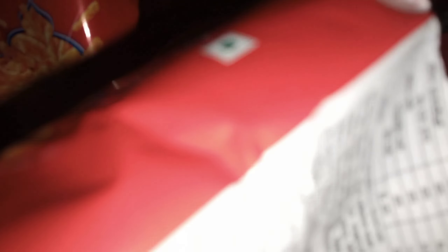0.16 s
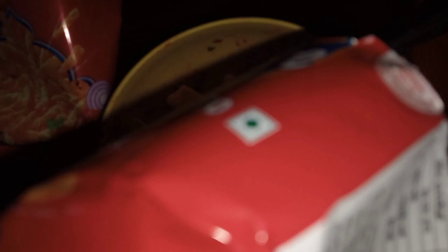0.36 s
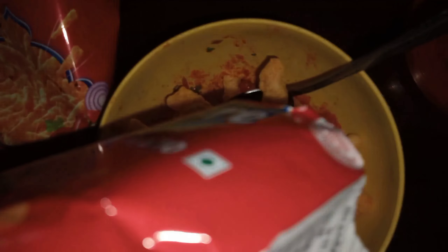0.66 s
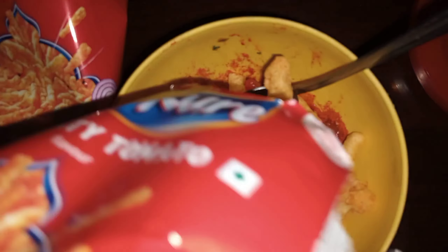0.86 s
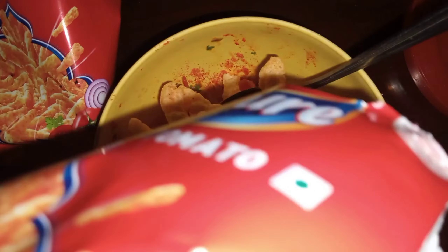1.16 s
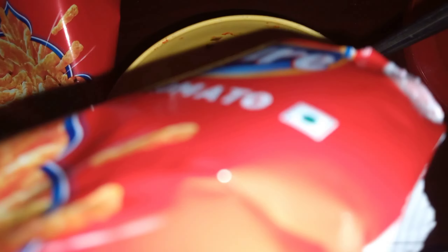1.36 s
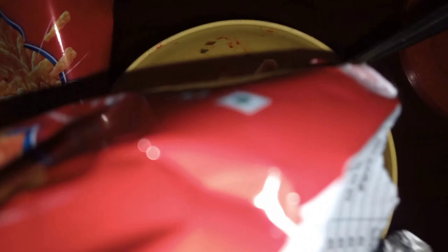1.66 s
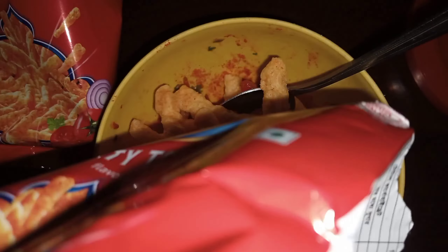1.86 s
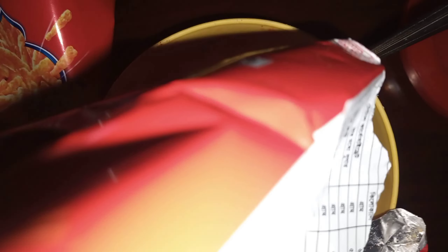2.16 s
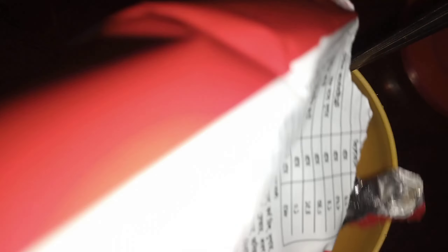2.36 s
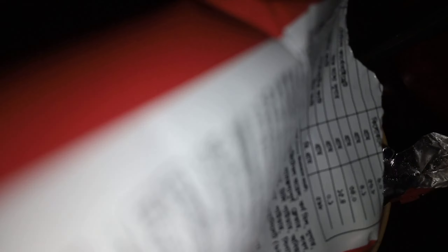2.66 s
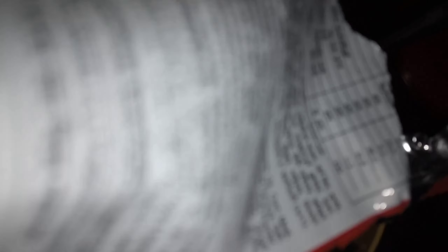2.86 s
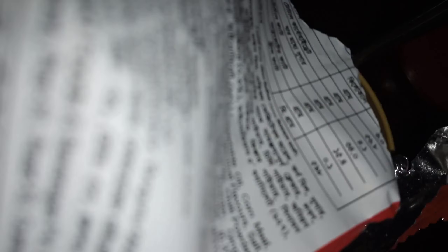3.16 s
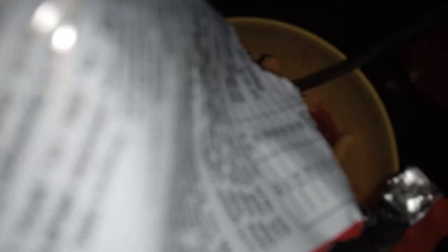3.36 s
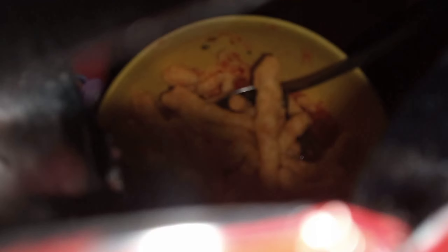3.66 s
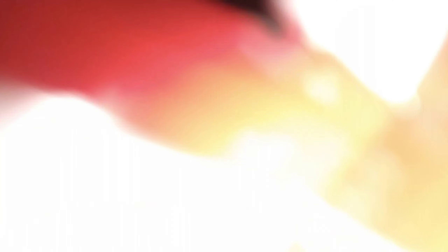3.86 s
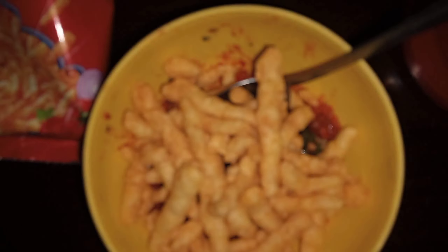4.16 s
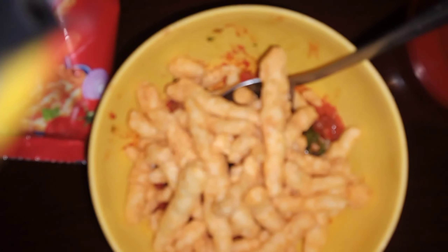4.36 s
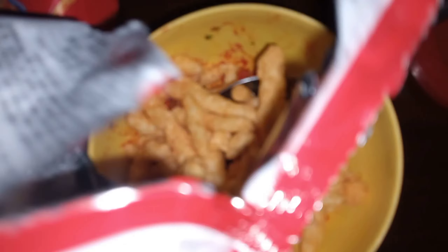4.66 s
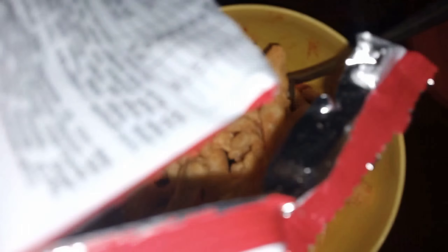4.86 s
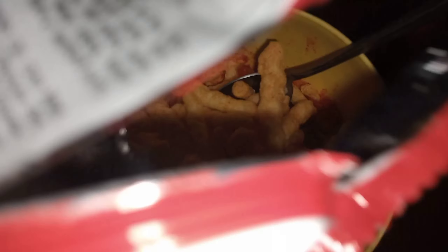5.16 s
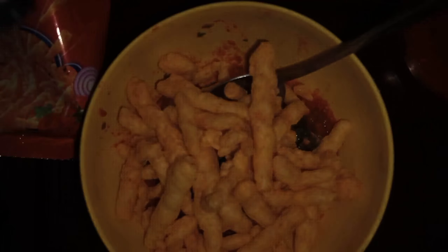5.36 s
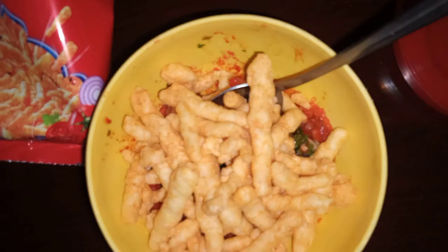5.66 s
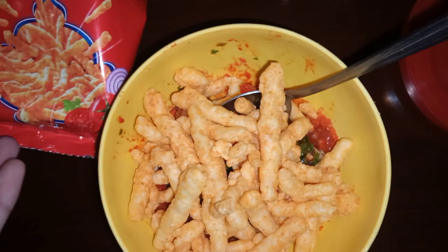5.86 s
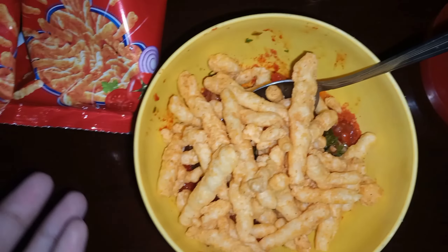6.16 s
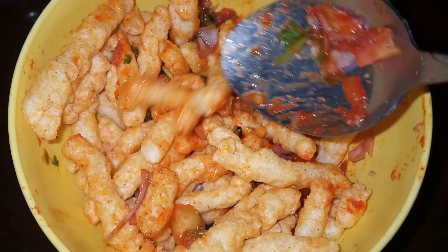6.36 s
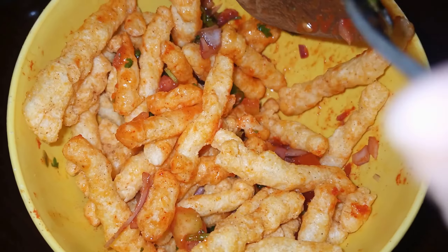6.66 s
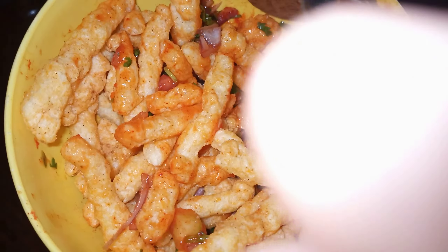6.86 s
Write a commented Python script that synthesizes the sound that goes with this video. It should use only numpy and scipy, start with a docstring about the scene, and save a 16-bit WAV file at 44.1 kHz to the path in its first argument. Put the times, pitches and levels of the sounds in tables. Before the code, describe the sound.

A crinkly foil snack packet snaps and rustles up close over a faint low kitchen hum, then cuts briefly to quieter, duller room air.

```python
"""In a kitchen with a low hum, a crinkly foil snack packet is shaken over a bowl close to a phone.
Buckling creases snap and excite resonant bands of the film; small creases rustle between them.
Two near walls throw each snap back, knocks reach the phone through the hand, and shaped noise makes
hum, bass and air. Near the end the sound drops out for a moment and returns as a quieter, duller kitchen."""
import sys
import numpy as np
from scipy import signal
from scipy.fft import rfft, irfft, next_fast_len
from scipy.io import wavfile
from scipy.ndimage import uniform_filter1d

SR = 44100
rng = np.random.default_rng(int(sys.argv[2]) if len(sys.argv) > 2 else 0)


def unload_audio(sound):
    """Save the sound as a 16-bit wav file, at the path given as the first command line argument."""
    columns = np.transpose(np.atleast_2d(sound))
    # keep every value between -1 and 1, then stretch to whole-number steps
    steps = np.round(np.clip(columns, -1, 1) * 32767)
    wavfile.write(sys.argv[1], SR, steps.astype(np.int16))


N = 309582  # length in samples


def amp(db):
    """Decibel law: a level becomes an amplitude ratio."""
    return 10 ** (np.asarray(db) / 20)


def evened(x):
    """Normalisation: the signal is brought to rms 1."""
    return x / np.sqrt(np.mean(x ** 2) + 1e-20)


def read(points, hz):
    """Logarithmic pitch scale: a table of frequency is read along log frequency."""
    f, value = np.transpose(points)
    return np.interp(np.log(hz + 1), np.log(f + 1), value)


def curve(rows, column=1):
    """Envelope: one column of a table is joined by straight lines over time."""
    rows = np.array(rows)
    return np.interp(np.arange(N) / SR, rows[:, 0], rows[:, column])


def coloured(x, points):
    """Linear filtering: the spectrum is multiplied by a response, then the rms is set to 1."""
    size = next_fast_len(N)
    spectrum = rfft(x, size)
    response = amp(read(points, np.fft.rfftfreq(size, 1 / SR)))
    return evened(irfft(spectrum * response, size)[:N])


def patchy(points, patchy_db):
    """Non-stationary noise: a short-time spectrum drifts in patches; rms 1."""
    frames, hz = N // 256 + 5, np.fft.rfftfreq(1024, 1 / SR)
    real, imaginary, patches = rng.standard_normal((frames, 513, 3)).T
    patches = uniform_filter1d(patches, size=10, axis=0)  # smooth over frequency
    patches = evened(uniform_filter1d(patches, size=12, axis=1))  # smooth over time
    level = read(points, hz)[:, None] + patchy_db * patches
    spectra = (real + 1j * imaginary) * amp(level)
    return evened(signal.istft(spectra, nperseg=1024, noverlap=768)[1][:N])


def band(x, hz, width):
    """Resonance: a bandpass filter passes a band around a centre frequency."""
    edges = np.clip([hz - width / 2, hz + width / 2], 300, 19000)
    return signal.sosfilt(signal.butter(2, edges, "band", fs=SR, output="sos"), x)


# the loudest creases that buckle: (time [s], ring of the film [dB], belly, panel and edge [dB re that ring],
# note of the film [Hz], note of the panel [Hz])
LOUD_SNAPS = [(0.0073, -28.5, -27, -5, -22, 6670, 3640), (0.1093, -23, -9, 4, -45, 6900, 3780),
              (0.3421, -16.5, -18.5, -11, -7, 6600, 4020), (0.483, -15, -18, -3, -33.5, 6100, 3410),
              (0.3925, -45, -20, -10, -8.5, 7300, 3600), (0.5492, -38, -4.5, -1, -31, 6100, 2810),
              (0.6428, -20.5, -16, 3.5, -7.5, 6030, 3870), (0.645, -12.5, -23.5, -5.5, -43.5, 6400, 3580),
              (0.6544, -46, 14.5, -18, -23.5, 6800, 3500), (0.6955, -42.5, -6, -3, -13.5, 7000, 3600),
              (0.7898, -39.5, -14.5, -9.5, -8, 6560, 2840), (0.8102, -22.5, -10.5, -5, -10.5, 7100, 3530),
              (0.8139, -19, -10.5, 2.5, -2.5, 7370, 3600), (0.8235, -43.5, -7, 7, -14.5, 5800, 3430),
              (0.8361, -20.5, -11, -2.5, -21, 4900, 2820), (0.845, -17, -6, -5, -7.5, 6200, 3760),
              (0.8603, -27.5, -8, -5, -20, 5800, 4640), (0.87, -39.5, -17, -2, -35, 5470, 3960),
              (0.908, -23, -8.5, 1.5, -4.5, 6900, 3180), (0.9146, -21, -22, -3, -36, 6280, 2740),
              (0.9225, -26, -18, -13, -10, 5810, 2780), (0.929, -28, -3.5, 0, -18, 7800, 3130),
              (0.9457, -23, -5, -2, -8, 5290, 3350), (1.0115, -11, -10.5, -4.5, -4, 4600, 3340),
              (1.113, -42, 1.5, 10, -33, 5700, 3440), (1.2969, -12.5, -35, -6, -8, 6100, 4750),
              (1.3115, -31.5, -7.5, -6.5, -10, 6440, 3400), (1.6608, -35, -23, -13, -28, 6700, 3880),
              (1.6734, -34.5, 11, -19.5, -22, 6950, 2720), (1.679, -22.5, -26, -5, -33, 7000, 3760),
              (1.695, -36, -12.5, 5, -25, 6670, 3840), (1.706, -29.5, -3, -18, -13, 6060, 3900),
              (1.742, -35, 0.5, -2, -32, 6300, 3800), (1.8092, -40.5, -19, -29, -34, 6460, 2810),
              (1.8244, -25.5, -24.5, -16, -19.5, 6350, 3330), (1.8315, -31.5, -19, -15, -34, 6400, 3390),
              (1.84, -36, -30, 2.5, -22.5, 6600, 3480), (1.8534, -34, -27, -4, -31, 6350, 3060),
              (1.888, -49, -20, 6.5, -14, 6200, 2970), (1.907, -38, -29, -26, -27, 6700, 3660),
              (1.9403, -32.5, -24, -6, -18, 6500, 4740), (1.9745, -22, -27, -12.5, -11.5, 5540, 3800),
              (1.994, -28.5, -28, 1, -18.5, 6500, 3550), (2.0391, -41, -21, 12.5, -26, 6800, 3420),
              (2.0472, -22.5, -40, -12, -14.5, 6300, 3500), (2.3756, -36, -7, -9, -2, 6040, 3590),
              (2.427, -38.5, -12, -11, -36, 6060, 3680), (2.497, -39, -8, -10, -14, 6000, 3640),
              (2.5077, -38.5, -4, 9.5, -11.5, 6470, 3400), (2.6003, -32.5, -19, 7.5, -27, 6500, 4230),
              (2.6917, -31, -16, -14, -19, 6100, 3600), (2.7294, -38, -6.5, -12, -30, 6360, 4210),
              (2.7528, -38, -5.5, 15.5, -16, 6650, 3700), (2.8436, -46, -16, -9, -30, 7150, 4200),
              (3.056, -39, -10, 0, -20, 6000, 3500), (3.114, -40.5, -15, -4.5, -22, 6970, 4660),
              (3.2106, -45, 1.5, 5, -19, 6440, 4060), (3.2961, -26, -13, -4, -25, 6100, 4380),
              (3.3794, -37.5, -14, -5.5, -5.5, 6840, 3730), (3.4956, -38.5, -9, 2.5, -0.5, 6240, 3560),
              (3.513, -34, -29, -19, -27, 6600, 3100), (3.5222, -38.5, -9, -5, -5.5, 5850, 2810),
              (3.534, -40, -19, -9.5, -12.5, 7640, 3850), (3.5684, -25.5, -41, -10, -15, 4950, 5000),
              (3.58, -36, -32, -29, -30, 6300, 4630), (3.606, -40.5, -26, -19, -30, 6200, 4590),
              (3.6147, -29, -24, -20, -19.5, 6340, 3710), (3.6177, -35, -26, -12, -29, 6300, 3570),
              (3.621, -31, -32, -25, -23.5, 6350, 4800), (3.6625, -28.5, -18, 0.5, -23.5, 6540, 3530),
              (3.67, -33.5, -12, 5.5, -36, 5000, 3610), (3.686, -38.5, -13, -2.5, -8, 6600, 3630),
              (3.7168, -18.5, -44, -37.5, -17.5, 6220, 4960), (3.7265, -37.5, -30, -20, -20, 6240, 4900),
              (3.7837, -32.5, -32, -6, -15, 6400, 4590), (3.8132, -27, -34, -4, -23.5, 6540, 3800),
              (3.8716, -37, -10, -6, -35, 5770, 4600), (4.065, -46.5, -0.5, -19, 2, 6360, 3030),
              (4.0908, -40.5, 0, 5.5, -4, 6670, 3030), (4.5413, -38.5, -14, -8.5, 0.5, 6200, 2810),
              (4.936, -47.5, -13, -16, -3.5, 7000, 3600), (5.1027, -36, -8, -3.5, -18, 5680, 3460),
              (5.5406, -29, -9.5, -3.5, -40, 6900, 4200), (5.5455, -35.5, -11.5, -3, -20, 5900, 2810),
              (5.774, -44.5, -24, -18, -12.5, 6940, 3600), (5.8763, -38.5, -9, 1.5, -22.5, 5860, 3520),
              (6.018, -16.5, -40, -18, -5.5, 7320, 3560), (6.138, -47.5, -26, -19, -3.5, 6250, 3600),
              (6.1613, -26.5, -7, 9.5, -9, 4500, 3980), (6.173, -42, -7, 10.5, -21, 5500, 3600)]
# resonances a snap excites, in the order film, belly, panel, edge, tip: (centre [Hz], width [Hz])
PACKET_BANDS = [(6550, 1530), (2002, 730), (3600, 1120), (10350, 4650), (14200, 4500)]
FILM_WIDTH_HZ, PANEL_WIDTH_HZ = 720, 395  # narrow notes
SKIRT_DB = -1  # the broad crack around the notes, for a film ring of -16.5 dB
HARD_DB, HARD_MS, BUSY_DB = -18, 1.15, -50  # a hard snap in moderate handling: its slips fall 9 dB in HARD_MS
LONGER_SOFT, LONGER_BUSY = 0.34, 0.4  # slips last longer in softer snaps and busier handling: dB of length per dB
RISE_MS = 0.53  # slips build up
TWIN_MS, TWIN_DB = (1.0, 2.6), -6  # range of lag, and level, of the twin crease


def slip_bursts(rows, starts, t, lead):
    """Stick-slip friction: a creak grows until the release, then random slips decay; also gives spare draws."""
    draws = rng.standard_normal((len(rows), len(t) + 2))
    softness = LONGER_SOFT * (HARD_DB - rows[:, 1])
    busyness = LONGER_BUSY * (curve(HANDLING)[starts] - BUSY_DB)
    length_ms = np.clip(HARD_MS * amp(softness + busyness), .5, 20)[:, None]
    creak = amp(-22.5 + 3000 * np.minimum(t, 0))  # grows by 3 dB per ms
    slips = amp(-9 * np.maximum(t, 0) * 1000 / length_ms)
    rise = np.clip(t * 1000 / RISE_MS, 0, 1)
    bursts = draws[:, 2:] * ((1 - rise) * creak + rise * slips)
    bursts[:, lead + 8] += 2.2  # the click of the release itself
    # a twin crease follows each snap, so its spectrum splits into bands
    lags = (SR / 1000 * np.interp(np.tanh(draws[:, 1]), (-1, 1), TWIN_MS)).astype(int)
    bursts = np.array([b + amp(TWIN_DB) * np.roll(b, lag) for b, lag in zip(bursts, lags)])
    return bursts, draws


def snaps():
    """Impulsive excitation of resonators: each buckling crease lets go in a burst that rings the packet."""
    lead = 300  # samples of creak before the release
    rows = np.array(LOUD_SNAPS + lesser())
    out, t = np.zeros(N + 2000), (np.arange(1300) - lead) / SR
    starts = np.maximum(np.round(rows[:, 0] * SR).astype(int), 0)
    bursts, draws = slip_bursts(rows, starts, t, lead)
    crisp = bursts * amp(-1200 * np.maximum(t, 0))  # the treble dies first
    excitations = [bursts] * 3 + [crisp] * 2
    broad = np.array([band(x, *part) for x, part in zip(excitations, PACKET_BANDS)])
    for k, (s, film_db, belly_db, panel_db, edge_db, film_hz, panel_hz) in enumerate(rows):
        film, belly, panel, edge, tip = map(evened, broad[:, k])
        skirt = amp(SKIRT_DB + .3 * (film_db + 16.5))  # hard snaps crack more broadly
        belly_hz = PACKET_BANDS[1][0] * (1 + 0.16 * draws[k, 0])
        film = skirt * film + evened(band(bursts[k], film_hz, FILM_WIDTH_HZ))
        panel = skirt * panel + evened(band(bursts[k], panel_hz, PANEL_WIDTH_HZ))
        belly = skirt * belly + evened(band(bursts[k], belly_hz, 350))
        edge = edge + amp(-2.0) * tip
        for ring, db in zip((film, belly, panel, edge), (0, belly_db, panel_db, edge_db)):
            loudest = np.sqrt(2 * uniform_filter1d(ring ** 2, size=88).max())  # over 2 ms
            out[starts[k]:starts[k] + len(t)] += amp(film_db + db) * ring / loudest
    return out[lead:lead + N]


# mean and spread of a lesser snap: (film [dB re handling], belly, panel and edge [dB re film], film and panel [Hz])
LESSER_MEAN = (0.5, -15, -4, -23.5, 6304, 3509)
LESSER_SPREAD = (3.5, 7, 8.6, 7.4, 550, 510)
LESSER_COUNT = 120
CROWDING = .7  # dB of density per dB of handling


def lesser():
    """Random point process: rows for lesser snaps fall by chance, thicker where handling is harder."""
    level, draws = curve(HANDLING), rng.standard_normal((LESSER_COUNT, 6))
    before_break = np.arange(N) / SR < BREAK_LEVELS[0][0][0]
    share = np.cumsum(amp(CROWDING * level) * before_break)
    at = np.searchsorted(share, share[-1] * rng.random(LESSER_COUNT))
    rows = LESSER_MEAN + np.clip(draws, -2, 2) * LESSER_SPREAD
    return [(k / SR, level[k] + row[0], *row[1:]) for k, row in zip(at, rows)]


# handling of the packet: (time [s], level [dB]); the rustle is set 7 dB under it
HANDLING = [(0.0, -42), (0.1, -56), (0.28, -65), (0.76, -53.5), (0.9, -36.5), (1.09, -42), (1.18, -48.5),
            (1.58, -58), (1.69, -37.5), (1.79, -47.5), (1.9, -40), (2.03, -54), (2.4, -49), (3.06, -54),
            (3.4, -57), (3.62, -53), (3.84, -58), (6.09, -55.5), (6.17, -46), (6.32, -52)]
# relative spectrum of the rustle: (frequency [Hz], level [dB])
RUSTLE_COLOUR = [(900, -27), (1600, -13), (2550, -2), (3600, 8.5), (4900, -4.5), (6150, 8), (7500, -4.5),
                 (10000, -23), (12400, -13.5), (15200, -15), (16500, -27)]


def rustle():
    """Crackling noise: many small creases tick at random, some as thin clicks, some with a short note."""
    sizes, chance = rng.exponential(1, (2, N)), rng.random((2, N))
    notes = amp(2.0 * np.minimum(sizes[0], 5)) * (chance[0] < 3000 / SR)  # 3000 per second
    clicks = amp(4.1 * np.minimum(sizes[1], 5)) * (chance[1] < 700 / SR)  # 700 per second
    crease, t, ringing = rng.integers(0, 40, N), np.arange(400) / SR, np.zeros(N)
    for k, hz in enumerate(np.geomspace(1300, 16000, num=40)):
        note = np.sin(2 * np.pi * hz * t) * np.minimum(t / 0.00042, 1) * np.exp(-t / 0.0031)
        rung = signal.oaconvolve(notes * (crease == k), note)[:N]
        ringing += amp(read(RUSTLE_COLOUR, hz)) * np.sqrt(hz) * rung
    thin = signal.oaconvolve(clicks, np.exp(-t / 0.00053))[:N] * rng.standard_normal(N)
    mix = evened(ringing) + amp(-1.0) * coloured(thin, RUSTLE_COLOUR)
    return amp(curve(HANDLING) - 7.0) * evened(mix)


# decay of the kitchen's reverberation: (frequency [Hz], time to fall 60 dB [s])
KITCHEN_DECAY = [(1000, 0.36), (2500, 0.15), (4000, 0.12), (7000, 0.088), (12000, 0.058)]
FLUTTER_S, FLUTTER_DB = .0105, 10  # spacing; level of the second return re one tap, before the decay
REFLECTIONS_DB = -11  # flutter and tail together, re the direct sound


def kitchen(x):
    """Room reflection: a flutter between two near walls, and a sparse tail whose bands die at their own speeds."""
    taps = np.zeros(SR // 2)
    at = np.arange(100, len(taps) - 20, 20)
    taps[at + rng.integers(0, 20, len(at))] = rng.choice([-1., 1.], len(at))
    for k in (1, 2, 3, 4):
        # shelves scatter each return
        rough = rng.standard_normal(150) * np.exp(-np.arange(150) / (8.3 * k))
        returned = amp(FLUTTER_DB - 4 * (k - 2.0)) * rough / np.linalg.norm(rough)
        taps[round(k * FLUTTER_S * SR):][:150] += returned
    hz, t, z = signal.stft(taps, SR, nperseg=256)
    t60 = np.maximum(read(KITCHEN_DECAY, hz), .02)[:, None]
    tail = signal.istft(z * amp(-60 * t / t60), SR, nperseg=256)[1]
    return x + signal.fftconvolve(x, amp(REFLECTIONS_DB) * tail / np.linalg.norm(tail))[:N]


# knocks through the hand into the phone: (time [s], peak of the swell [dB], pitch [Hz], length [s])
KNOCKS = [(0.054, -50, 71, 0.07), (0.172, -39, 90.5, 0.037), (.62, -53, 69.4, 0.033),
          (0.831, -46.5, 71.4, 0.054), (1.105, -43, 66, 0.054), (1.265, -57, 50, 0.037),
          (2.044, -56, 60, 0.032)]


def thumps():
    """Structure-borne sound: each knock is a few low cycles under a soft swell that peaks at a third of its length."""
    out = np.zeros(N)
    for s, db, hz, length in KNOCKS:
        t = np.arange(0, 3 * length, 1 / SR)
        swell = 3 * t / length * np.e * np.exp(-3 * t / length)
        out[round(s * SR):][:len(t)] += amp(db) * np.sin(2 * np.pi * hz * t) * swell
    return out


# the hum swells and the bass bumps, before wavering: (time [s], hum level [dB], bass level [dB])
HUM_BASS_LEVELS = [(0.0, -50.5, -70.5), (0.14, -41, -60), (0.19, -60, -43), (0.26, -54, -60),
                   (0.44, -50, -64), (0.63, -54, -52.5), (0.77, -52, -63.5), (1.07, -55.5, -57),
                   (1.39, -52.5, -63), (1.94, -54.5, -64.5), (2.0, -42.5, -63), (2.13, -52, -61),
                   (2.22, -42.5, -64.5), (2.31, -50.5, -63.5), (2.83, -50, -63.5), (3.13, -54, -72),
                   (3.22, -46, -50.5), (3.29, -49, -61), (3.36, -34.5, -42.5), (3.5, -51.5, -61),
                   (3.55, -46.5, -61.5), (3.63, -58.5, -62.5), (3.68, -48.5, -46), (3.77, -54.5, -63.5),
                   (6.32, -54, -66.5)]
# relative spectrum of the hum: (frequency [Hz], level [dB])
HUM_COLOUR = [(110, -55.5), (150, -12), (200, -1.5), (250, 7), (300, 0.5), (380, -7.5), (600, -30.5),
              (705, -3.5), (820, -47.5), (1100, -56.5)]
# relative spectrum of the bass: (frequency [Hz], level [dB])
BASS_COLOUR = [(45, -43.5), (70, -9.5), (95, -4.5), (124, 13), (150, 3), (220, -53.5)]
HUM_WAVER_DB, BASS_WAVER_DB = 0.5, 2.5  # rms of the random wavering


def slow_waver(x, db):
    """Amplitude modulation: noise smoothed twice gives a slow random level in dB."""
    return db * evened(uniform_filter1d(uniform_filter1d(x, size=3000), size=3000))


def hum():
    """Narrow-band noise: a fuzzy hum with a faint overtone, and lumpy bass under it; both waver."""
    hum_noise, bass_noise, hum_drift, bass_drift = rng.standard_normal((N, 4)).T
    hum_db = curve(HUM_BASS_LEVELS) + slow_waver(hum_drift, HUM_WAVER_DB)
    bass_db = curve(HUM_BASS_LEVELS, 2) + slow_waver(bass_drift, BASS_WAVER_DB)
    return amp(hum_db) * coloured(hum_noise, HUM_COLOUR) + amp(bass_db) * coloured(bass_noise, BASS_COLOUR)


# relative spectral density of the kitchen air: (frequency [Hz], level [dB per Hz])
AIR_COLOUR = [(18, -32), (30, -37.5), (59, -19), (251, -8.5), (511, -15.5), (700, -10.5), (863, -13.5),
              (1420, -13.5), (1750, -15.5), (2740, -15), (5010, -25.5), (6020, -25), (11300, -46.5),
              (15900, -44.5)]
AIR_DB = -51.5  # rms


def kitchen_air():
    """Broadband background noise: steady air whose spectrum drifts in patches."""
    return amp(AIR_DB) * patchy(AIR_COLOUR, patchy_db=2.5)


# relative spectral density of the air after the break: (frequency [Hz], level [dB per Hz])
LATE_AIR_COLOUR = [(18, -38), (30, -5), (86, -16), (153, 1), (245, 6), (294, 1), (553, -9), (2110, -9),
                   (3290, -13.5), (5420, -12), (7620, -38), (15900, -27.5)]
# gain added to the late air: (time [s], level [dB])
LATE_GAIN = [(6.36, 4.5), (7.02, 4.5)]
LATE_BASE_DB = -61  # rms before that gain


def late_air():
    """Broadband background noise: the quieter, duller kitchen after the break."""
    return amp(LATE_BASE_DB + curve(LATE_GAIN)) * patchy(LATE_AIR_COLOUR, patchy_db=1.7)


# gain around the break, first the way out, then the way in: (time [s], level [dB])
BREAK_LEVELS = [(6.318, 4), (6.321, -23), (6.333, -35)], [(6.338, -41), (6.347, 2.5), (6.36, -1.5)]


def scene():
    """Superposition: the sources add up; at the break the level drops and the late air takes over."""
    packet = kitchen(snaps() + rustle())
    first = packet + hum() + thumps() + kitchen_air()
    second = late_air()
    late = np.arange(N) / SR > 6.336
    leaving = amp(curve(BREAK_LEVELS[0])) * first
    returning = amp(curve(BREAK_LEVELS[1])) * second
    return np.where(late, returning, leaving)[None]


# relative response of the microphone, overall rms kept: (frequency [Hz], level [dB])
MICROPHONE = [(8000, 2), (10000, 0.5), (13000, -6.5), (15200, 0), (15800, -1.5), (16050, -16.5)]
EDGE_HZ = 16700  # band limit


def record(dry):
    """Transduction: the microphone colours the treble, the converter clips at full scale; then the band limit."""
    heard = np.sqrt(np.mean(dry ** 2)) * coloured(dry[0], MICROPHONE)[None]
    lowpass = signal.firwin(511, EDGE_HZ, window=("kaiser", 9), fs=SR)[None]
    return signal.oaconvolve(np.clip(heard, -1, 1), lowpass, "same")


dry = scene()
out = record(dry)
unload_audio(out)
```